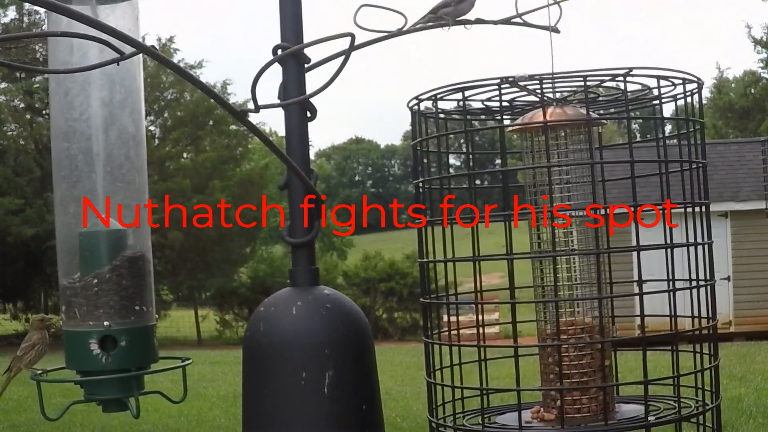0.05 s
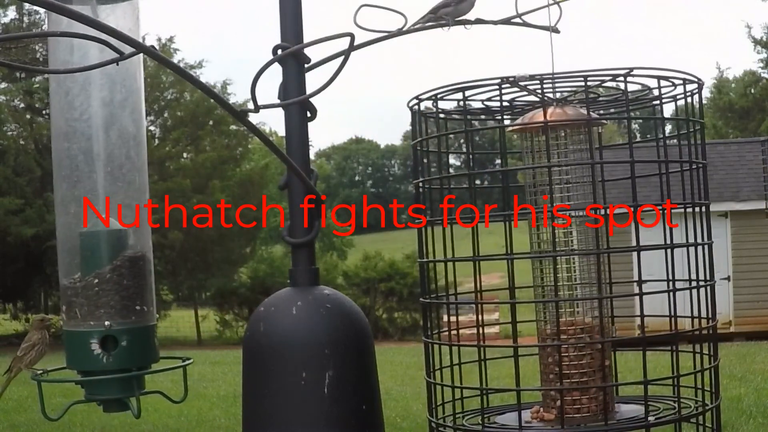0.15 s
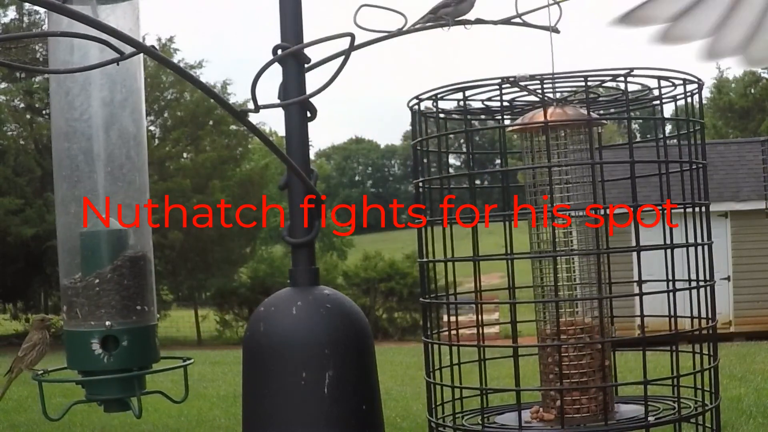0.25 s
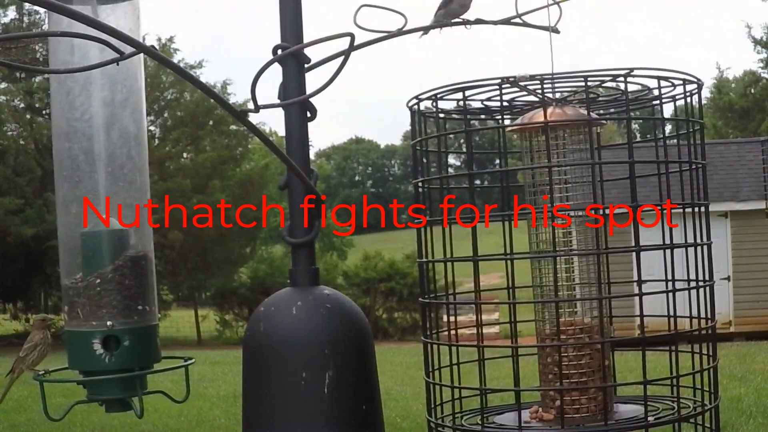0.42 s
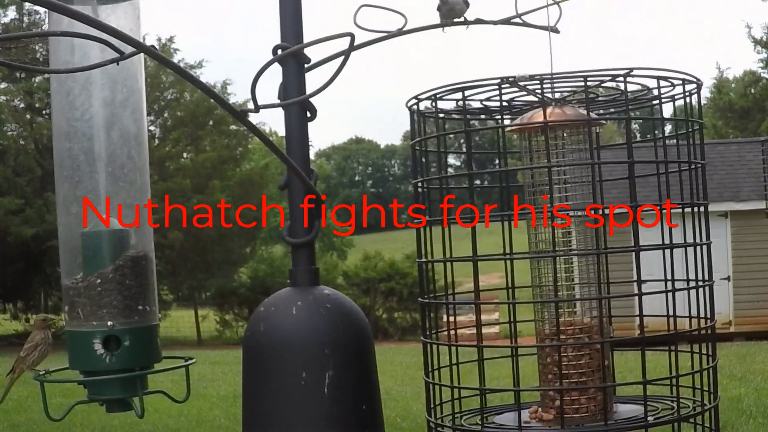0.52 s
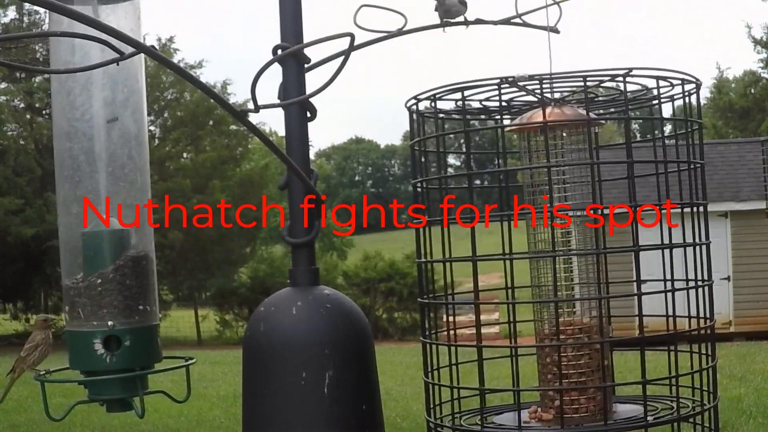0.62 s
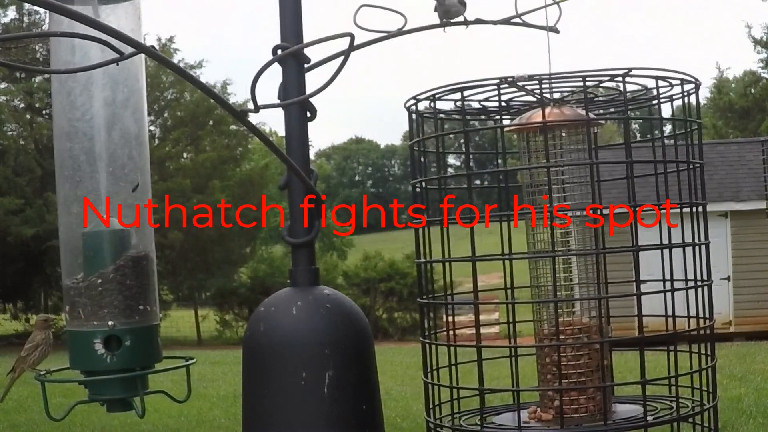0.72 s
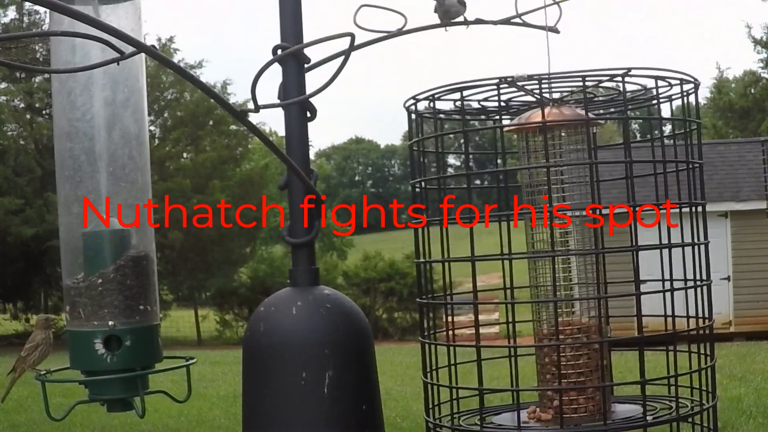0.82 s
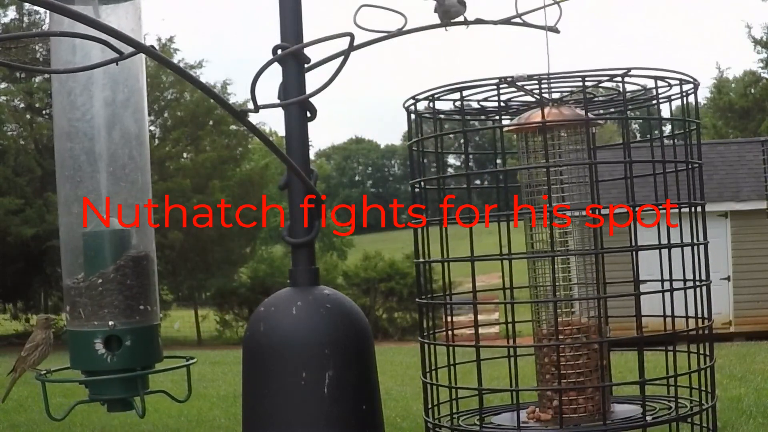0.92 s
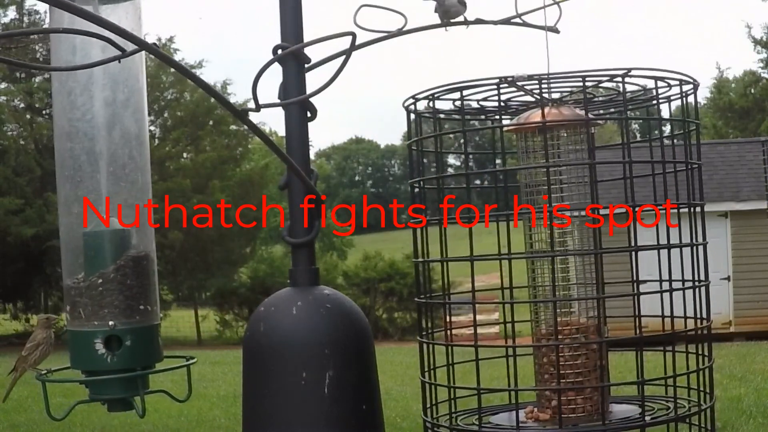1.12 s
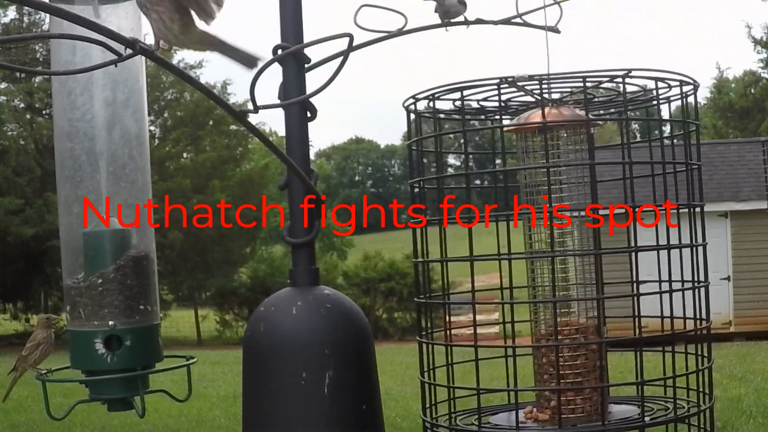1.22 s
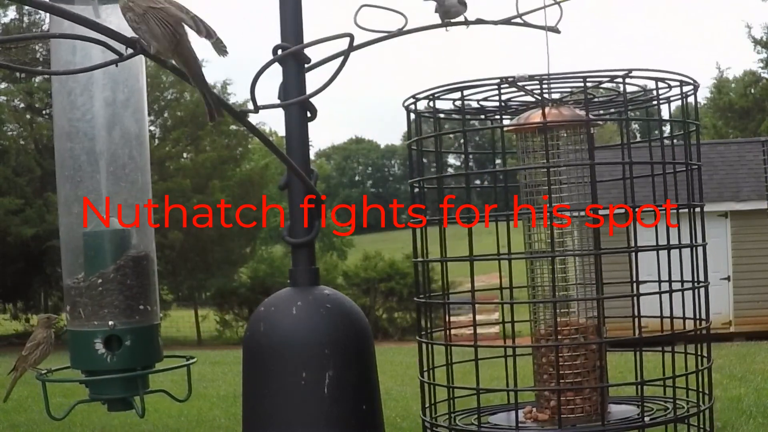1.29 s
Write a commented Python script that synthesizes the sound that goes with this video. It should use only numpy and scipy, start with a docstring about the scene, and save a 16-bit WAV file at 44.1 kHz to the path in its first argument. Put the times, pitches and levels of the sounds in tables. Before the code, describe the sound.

A close bird squeals twice as others whistle softly and tick against a feeder.

```python
"""A garden feeder, where small birds squabble. One close bird gives two nasal squeals that rise, dip and
rise into a warble: the two sides of its syrinx sound together, beat, and add harmonics and sum tones.
Others slip soft, nearly pure whistled glides in between. Beaks and claws strike the feeder in damped
ticks, and wings puff air as a bird flies in. Under it all lie three bands of noise: a low outdoor
rumble, a soft hiss and a blur of far birds."""
import sys
import numpy as np
from scipy import signal
from scipy.fft import rfft, irfft, next_fast_len
from scipy.io import wavfile
from scipy.ndimage import uniform_filter1d, map_coordinates

SR = 44100
rng = np.random.default_rng(int(sys.argv[2]) if len(sys.argv) > 2 else 0)


def store_pcm(level_fs):
    """Save levels as 16-bit WAV."""
    pcm = np.round(np.clip(level_fs, -1, 1) * 32767).astype(np.int16)
    wavfile.write(sys.argv[1], SR, np.atleast_2d(pcm).T)


N = 59535


def amp(db):
    """Amplitude ratio of a level in decibels."""
    return 10 ** (np.asarray(db) / 20)


def unit(x):
    """Normalisation to rms 1."""
    return x / np.sqrt(np.mean(x ** 2) + 1e-20)


def clock():
    """Uniform sampling: t/s of each sample."""
    return np.arange(N) / SR


def along(points, hz):
    """Interpolation of (f/Hz, value) points on a logarithmic frequency axis."""
    f, value = np.transpose(points)
    return np.interp(np.log(hz + 1), np.log(f + 1), value)


def gesture(rows, edge_s=0.0092, glide_s=0.0049):
    """Breakpoint envelopes: a ramped gate over the rows' span, then one smoothed curve per column."""
    times, *columns = np.transpose(rows)
    t = clock()
    gate = np.clip(np.minimum(t - times[0], times[-1] - t) / edge_s, 0, 1)
    return [gate] + [uniform_filter1d(np.interp(t, times, c), int(glide_s * SR)) for c in columns]


def swell(middle_s, half_s):
    """Gaussian envelope, down to 1/e at half_s either side of the middle."""
    return np.exp(-((clock() - middle_s) / half_s) ** 2)


def wobble(rate):
    """Random modulation: a spline through `rate` Gaussian knots a second."""
    knots = rng.standard_normal(int(N * rate / SR) + 4)
    return map_coordinates(knots, [np.arange(N) * rate / SR])


def phase_of(hz):
    """Phase as the time integral of frequency."""
    return 2 * np.pi * np.cumsum(hz) / SR


def filtered(x, response):
    """Linear filtering: the spectrum of x times a frequency response."""
    size = next_fast_len(N + SR // 4)
    return irfft(rfft(x, size) * response(np.fft.rfftfreq(size, 1 / SR)), size)[..., :N]


def sides(pan_db):
    """Interaural level difference: two gains, the left pan_db above the right."""
    return amp(np.array([[.5], [-.5]]) * pan_db)


def placed(x, pan_db, lead_ms):
    """Localisation by interaural level and time difference; the left ear leads by lead_ms."""
    phase_per_hz = np.array([[1j], [-1j]]) * np.pi * lead_ms / 1000
    return filtered(x, lambda hz: sides(pan_db) * np.exp(phase_per_hz * hz))


def noise(spectrum, correlation):
    """Partly coherent stereo noise of rms 1, from (f/Hz, level/dB) and (f/Hz, correlation) points."""
    def response(hz):
        angle = np.arccos(np.clip(along(correlation, hz), -1, 1)) / 2
        return amp(along(spectrum, hz)) * [np.cos(angle), np.sin(angle)]
    mid, side = filtered(rng.standard_normal((2, N)), response)
    return unit(np.array([mid + side, mid - side]))


# Coherence of the outdoor field, rumble and hiss alike: f/Hz, left-right correlation
FIELD_CORRELATION = [(90, 0.3), (160, -0.4), (300, -0.8), (600, -0.68), (1100, -0.59), (1650, 0.88),
                     (2600, 0.11), (4500, -0.13), (7500, 0.97)]
# Rumble spectrum: f/Hz, relative level/dB
RUMBLE_SPECTRUM = [(20, -18.5), (50, -37.5), (62, -15.5), (78, -1.5), (92, -2.5), (115, -3.5), (140, -11.5),
                   (200, -28), (400, -66)]
# Rumble envelope: t/s, level/dB
RUMBLE_ENVELOPE = [(0, -51), (.1, -55), (0.151, -40), (.2, -51.5), (.25, -44.5), (.3, -51), (.54, -48),
                   (.59, -55.5), (.76, -47.5), (.97, -52), (1.02, -57), (1.2, -50.5)]
def rumble():
    """Amplitude-modulated low-frequency noise: the outdoor rumble swells and sinks."""
    envelope = amp(np.interp(clock(), *np.transpose(RUMBLE_ENVELOPE)))
    return envelope * noise(RUMBLE_SPECTRUM, FIELD_CORRELATION)


# Spectrum of the garden's hiss: f/Hz, relative level/dB
HISS_SPECTRUM = [(40, -33), (120, -1.5), (200, 1.5), (400, -2), (750, -7.5), (1400, -18.5), (2100, -20),
                 (2550, -21.5), (2850, -17.5), (3080, -12), (3350, -16.5), (4200, -16.5), (5000, -17),
                 (5700, -24), (7000, -27), (8000, -56)]
def hiss(level_db=-48.5, swing_db=0.68):
    """Ambient noise floor: a broad band whose level wavers slightly."""
    return amp(level_db + swing_db * wobble(18.97)) * noise(HISS_SPECTRUM, FIELD_CORRELATION)


# Spectrum of the far birds: f/Hz, relative level/dB
CHATTER_SPECTRUM = [(600, -29), (800, -6), (1000, -0.5), (1150, 2), (1280, -3.5), (1470, -9), (1640, 1),
                    (1820, -7), (2100, -10), (2300, -14), (2500, -38)]
# Envelope of the far birds: t/s, level/dB
CHATTER_ENVELOPE = [(0, -69), (.15, -59), (.62, -59.5), (0.801, -53.5), (1.03, -62.5), (1.15, -53),
                    (1.33, -58)]
def far_chatter():
    """Incoherent superposition: far birds blur into one band of noise."""
    envelope = amp(np.interp(clock(), *np.transpose(CHATTER_ENVELOPE)))
    return envelope * noise(CHATTER_SPECTRUM, [(1000, -0.32), (1600, 0.62)])


def garden_scatter(x, t60_s=.2):
    """Diffuse reflection from walls and trees: convolution with exponentially decaying noise."""
    t = np.arange(SR // 3) / SR
    tail = rng.standard_normal((2, len(t))) * amp(-60 * t / t60_s)
    return signal.fftconvolve(x, tail / np.linalg.norm(tail[0]), axes=1)[:, :N]


def patter(per_s=60, level_db=-67, t60_s=0.011):
    """A Poisson process: claws and seed scratch faintly in brief, decaying bursts of noise."""
    impulses = (rng.random(N) < per_s / SR) * rng.uniform(0.28, 1, N)
    decay = amp(-60 * np.arange(SR // 20) / SR / t60_s)
    bursts = signal.fftconvolve(impulses, decay)[:N]
    scratch = noise([(2500, -26.5), (4800, 5.5), (7500, -16)], [(5000, 0.01)])
    return amp(level_db) * unit(bursts * scratch)


# Wingbeats: middle t/s, half length/s, level/dB, spectral peak f/Hz
WINGBEATS = [(1.16, 0.018, -44.5, 78), (1.333, 0.0096, -48, 210)]
# Spectrum of one puff: f over peak f, relative level/dB
PUFF_SPECTRUM = [(.5, -30.5), (1, 2), (1.8, -19.5), (3.5, -20.5), (9, -37), (99, -80)]
def wings():
    """Air displacement: each wingbeat pushes out a soft puff of low noise."""
    out = np.zeros((2, N))
    for middle_s, half_s, level_db, peak_hz in WINGBEATS:
        puff = swell(middle_s, half_s)
        air = noise([(k * peak_hz, db) for k, db in PUFF_SPECTRUM], [(200, .6)])
        out += amp(level_db) * unit(puff * air) * np.sqrt(np.mean(puff ** 2))
    return out


# Impacts on the feeder: t/s, level/dB, resonance f/Hz, left over right/dB
FEEDER_IMPACTS = [(0.6396, -42.5, 5150, -10), (0.8605, -41.5, 6100, -2), (1.103, -39, 5200, -5),
                  (1.1968, -33.5, 5400, -6), (1.293, -43.5, 5700, -3), (1.328, -44, 4700, -10)]
def ticks(t60_s=.009, rise_s=.0006, relative_width=0.31, ring_share=.25):
    """Damped resonance: a beak or claw excites a crack of noise and a brief ring in the feeder."""
    out = np.zeros((2, N))
    for start_s, level_db, ring_hz, pan_db in FEEDER_IMPACTS:
        age = np.maximum(clock() - start_s, 0)
        resonance = lambda f: 1 / (1 + ((f / ring_hz - 1) / relative_width) ** 2) ** 2
        crack = np.sqrt(1 - ring_share) * unit(filtered(rng.standard_normal(N), resonance))
        ring = np.sqrt(2 * ring_share) * np.sin(2 * np.pi * ring_hz * age)
        envelope = amp(level_db - 60 * age / t60_s) * (1 - np.exp(-age / rise_s))
        out += sides(pan_db) * (crack + ring) * envelope
    return out


# Whistled notes: left over right/dB, left lead/ms, contour of (t/s, f/Hz, level/dB)
WHISTLE_NOTES = [ (-3.5, -0.071, [(0, 1716, -60), (.03, 1675, -57.5), (.08, 1646, -68)]),
                 (5.5, -0.46, [(.36, 810, -57), (.44, 895, -53), (.5, 1021, -50), (.535, 1049, -51)]),
                 (0.5, -0.055, [(.569, 1595, -51), (.578, 1748, -45), (.603, 1647, -52.5),
                 (.625, 1622, -42.5), (.672, 1650, -68)]), (0, 0, [(.682, 2780, -55.5), (.703, 2436, -63.5),
                 (.72, 2036, -50), (.734, 1985, -50), (.75, 1990, -50)]), (-2, -.03, [(.745, 1393, -52),
                 (.76, 1673, -44.5), (.778, 2112, -44.5), (.794, 2370, -51), (.812, 2233, -53.5),
                 (.835, 2276, -64)]), (-7.5, 0.22, [(.895, 1206, -53.5), (.93, 1180, -47.5),
                 (.96, 1261, -49), (.995, 1340, -46.5), (1.065, 1290, -66)]),
                 (-3.5, -0.13, [(1.058, 1597, -48), (1.072, 1637, -36.5), (1.083, 1562, -40.5),
                 (1.096, 1214, -46.5), (1.11, 1084, -49.5), (1.136, 1045, -39.5), (1.148, 1002, -47),
                 (1.17, 868, -52), (1.21, 723, -60)]), (7.5, -0.43, [(.97, 765, -70), (1.1, 820, -59),
                 (1.18, 885, -53.5), (1.245, 1020, -48.5), (1.28, 1072, -56), (1.335, 1012, -63)]),
                 (-5, -0.093, [(1.095, 1620, -49), (1.132, 1643, -63), (1.15, 1588, -43),
                 (1.165, 1595, -71), (1.2, 1635, -58), (1.235, 1600, -68)]),
                 (3.5, -0.066, [(1.318, 1650, -53), (1.328, 1730, -44.5), (1.342, 1635, -51),
                 (1.36, 1670, -34)])]
def whistle(pan_db, lead_ms, contour, waver=.007, octave_db=-28.5):
    """Frequency modulation of a nearly pure tone: one gliding note with a faint second harmonic."""
    gate, hz, level_db = gesture(contour)
    phase = phase_of(hz * (1 + waver * wobble(260)))
    tone = np.sin(phase) + amp(octave_db) * np.sin(2 * phase)
    envelope = np.sqrt(2) * gate * amp(level_db + 0.37 * wobble(130))
    return placed(envelope * tone, pan_db, lead_ms)


# Spectrum of the close bird's rasp: f/Hz, relative level/dB
RASP_SPECTRUM = [(600, -23.5), (1150, -1), (1650, 3.5), (2400, -8.5), (3150, 3.5), (3900, -1), (4400, -7.5),
                 (5000, -11.5), (6200, -18), (7000, -17), (8000, -42)]
def rasp(middle_s, half_s, scratch_lead_s=0.064, scratch_half_s=0.036, scratch_db=0.5):
    """Aperiodic part of a squeal: a scratchy onset and a main swell of noise add in power."""
    scratch = amp(scratch_db) * swell(middle_s - scratch_lead_s, scratch_half_s)
    return np.hypot(swell(middle_s, half_s), scratch) * noise(RASP_SPECTRUM, [(2000, 0.38)])


# Weights of harmonics 3 to 5: relative level/dB
REEDY_HARMONICS = [-0.5, -18, -15]
def overtones(low, high, upper_db, reedy_db, hoarse_rad):
    """Nonlinear mixing of two voices: harmonics and sum tones, reedier as the upper voice grows."""
    growth = amp(0.31 * upper_db)
    upper_gain, sum_tone_gain = growth * amp(-6), amp(upper_db - 6)

    def hoarse(depth, phase):
        """Random phase modulation roughens a partial."""
        return np.sin(phase + depth * hoarse_rad * growth * wobble(700))

    octave = hoarse(1.8, 2 * low) + upper_gain * hoarse(2, 2 * high)
    sum_tone = sum_tone_gain * hoarse(1.4, low + high)
    reedy = np.zeros(N)
    for k, db in enumerate(REEDY_HARMONICS, 3):
        lower = hoarse(k, k * low)
        upper_and_sum = hoarse(k, k * high) + hoarse(k, low + (k - 1) * high)
        reedy += amp(db) * (lower + upper_gain * upper_and_sum)
    return octave + sum_tone + amp(reedy_db + .85 * upper_db) * reedy


# Resonances of the throat: f/Hz, gain/dB
THROAT_RESPONSE = [(1500, -23.5), (2450, -11.5), (2850, -1), (3250, 7.5), (3850, 11.5), (4150, 2.5),
                   (4700, 0.5), (5050, -2.5), (5700, -10.5), (6350, -13), (7100, -1.5), (8000, -30)]
# Acoustic shadow on the close bird's treble, right side only: f/Hz, gain/dB
RIGHT_SHADOW = [(1600, 1), (2500, -5.5), (3200, -12), (3700, -18), (4100, -20.5), (4500, -12), (4900, -1)]
# Squeal contours: t/s, lower voice f/Hz, level/dB, upper voice over lower/dB, overtone gain/dB
FIRST_CONTOUR = [(.19, 1199, -52, -1.5, -10), (0.215, 1302, -49, -3.5, -2), (0.226, 1204, -40, -7, 5),
                 (.24, 1414, -40.5, -7, 0.5), (.254, 1596, -32, -20.5, -7.5),
                 (0.266, 1663, -28, -15, -11.5), (0.28, 1540, -32.5, -12, -4.5),
                 (0.293, 1420, -36.5, 2.5, -5.5), (0.308, 1400, -36, 2, -6.5),
                 (0.324, 1522, -35.5, -5.5, -4.5), (.347, 1584, -37.5, -13.5, -10.5),
                 (0.373, 1717, -42.5, -17, -29), (0.395, 1740, -45, -13, -24.5),
                 (0.41, 1593, -36, -28, -28)]
SECOND_CONTOUR = [(0.856, 1195, -47, -5, -16), (.875, 1431, -49.5, -7.5, -14.5),
                  (0.888, 1593, -37.5, -23, -12.5), (0.899, 1644, -31, -17.5, -21),
                  (0.909, 1569, -37, -5, -14.5), (.923, 1424, -44.5, 5, -12.5),
                  (.935, 1411, -39.5, -2.5, -13.5), (0.953, 1552, -38.5, -5, -15.5),
                  (0.97, 1627, -37.5, -23, -23), (0.999, 1704, -42, -16, -35),
                  (1.015, 1650, -42, -23.5, -33.5)]
# Voicing of each squeal: upper f over lower f at mid-rasp, warble onset t/s, share of the shadow,
# mid-rasp t/s, rasp half length/s, rasp level/dB, gain of harmonics 3 to 5/dB, hoarseness/rad
SQUEAL_VOICINGS = [(1.187, .315, 0.99, 0.2853, 0.071, -41.5, -3, 0.18),
                   (1.218, 0.93, 0.93, 0.936, 0.041, -49.5, 3.5, .24)]
def squeal(contour, ratio, warble_s, shadow_share, rasp_s, rasp_half_s, rasp_db, reedy_db, hoarse_rad):
    """Biphonation: both sides of the syrinx sound and beat, and the throat filters their overtones."""
    warble_hz, warble_depth, warble_rise_s, flutter_db = 78, .024, .012, 1.1
    jitter, spread_per_s = .004, 0.6
    gate, hz, level_db, upper_db, bright_db = gesture(contour)
    warble_onset = np.clip((clock() - warble_s) / warble_rise_s, 0, 1)
    warble = warble_onset * np.sin(phase_of(warble_hz * (1 + 0.069 * wobble(40))))
    vibrato = 1 + warble_depth * warble
    interval = ratio + spread_per_s * (clock() - rasp_s)  # the two voices drift apart
    low = phase_of(hz * (vibrato + jitter * wobble(460)))
    high = phase_of(interval * hz * (vibrato + jitter * wobble(500)))
    partials = overtones(low, high, upper_db, reedy_db, hoarse_rad)
    envelope = np.sqrt(2) * gate * amp(level_db + flutter_db * warble + 0.68 * wobble(200))
    voices = envelope * (np.sin(low) + amp(upper_db) * np.sin(high))
    brightness = amp(bright_db + 1.1 * wobble(160))
    nasal = filtered(envelope * brightness * partials, lambda f: amp(along(THROAT_RESPONSE, f)))
    treble = nasal + amp(rasp_db) * rasp(rasp_s, rasp_half_s)
    shadow = lambda f: amp(np.outer([0, shadow_share], along(RIGHT_SHADOW, f)))
    return placed(voices, pan_db=1.4, lead_ms=-0.048) + filtered(treble, shadow)


def scene():
    """Superposition in the open garden; the farther whistlers have more reflected sound for their level."""
    calls = zip((FIRST_CONTOUR, SECOND_CONTOUR), SQUEAL_VOICINGS)
    near = sum(squeal(contour, *voicing) for contour, voicing in calls) + ticks()
    far = sum(whistle(*note) for note in WHISTLE_NOTES)
    reflected = garden_scatter(amp(-19) * near + amp(-6) * far)
    return near + far + reflected + wings() + rumble() + far_chatter() + hiss() + patter()


def record(dry):
    """Band limiting: a low-pass whose gain falls linearly to zero across the cutoff."""
    cutoff_hz, transition_hz = 7700, 200
    return filtered(dry, lambda hz: np.clip((cutoff_hz - hz) / transition_hz + .5, 0, 1))


dry = scene()
out = record(dry)
store_pcm(out)
```